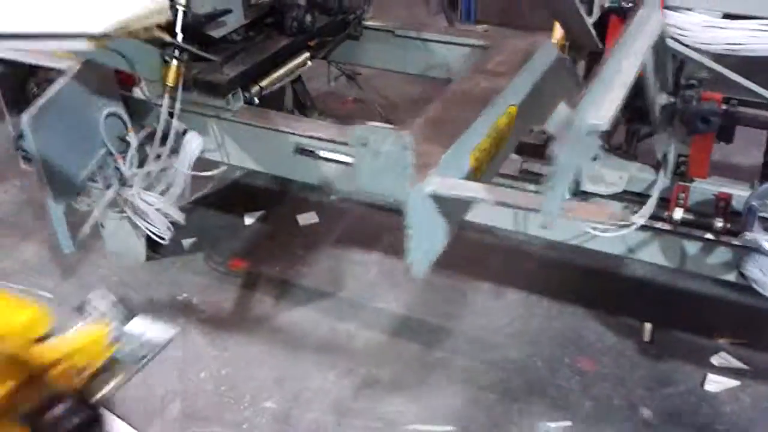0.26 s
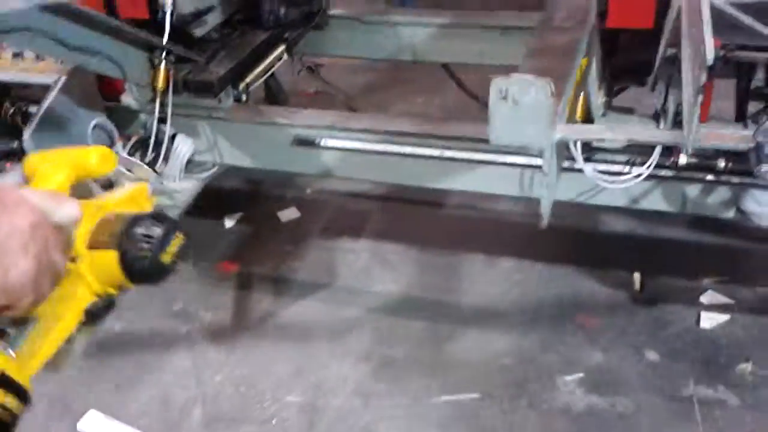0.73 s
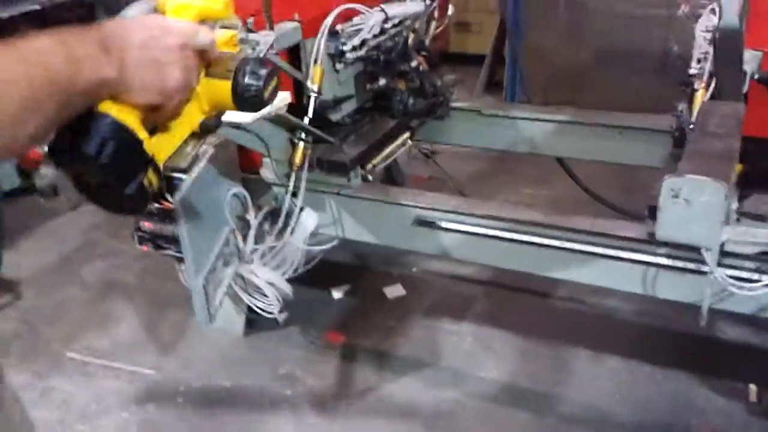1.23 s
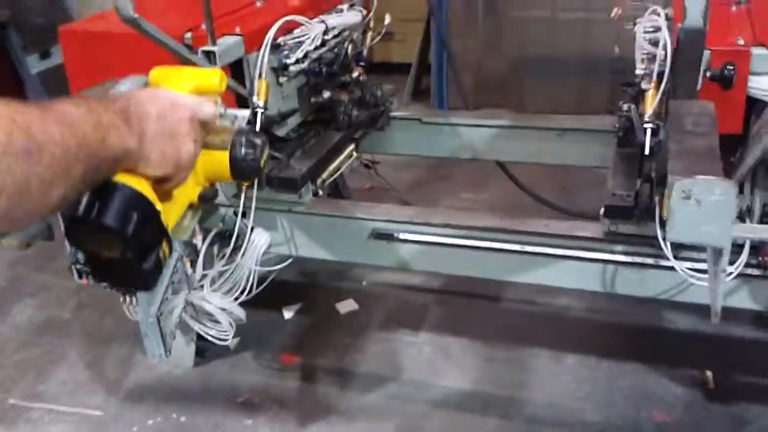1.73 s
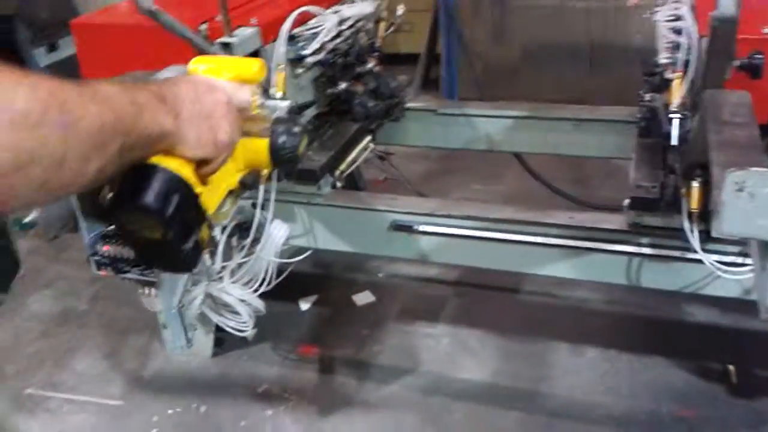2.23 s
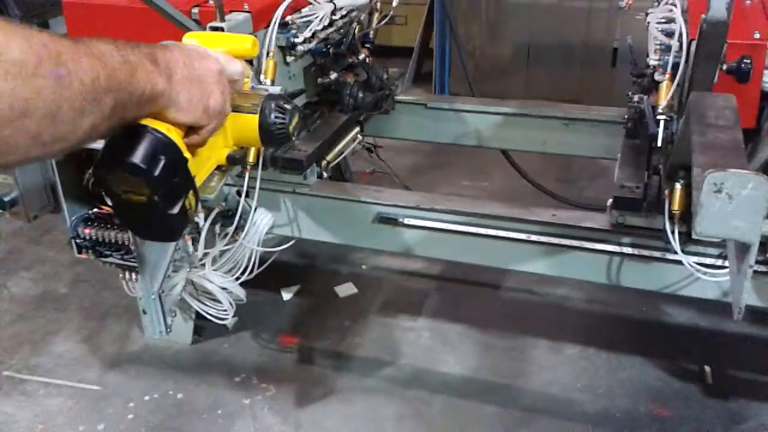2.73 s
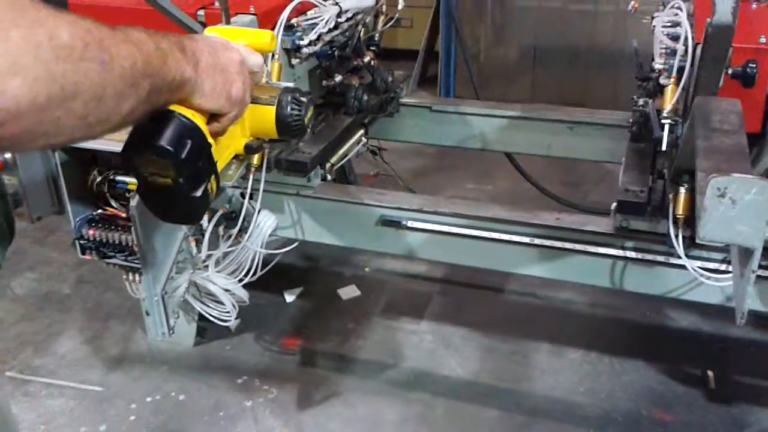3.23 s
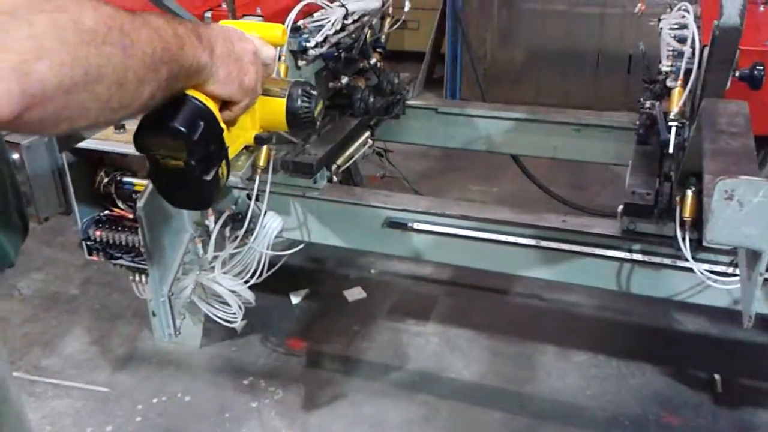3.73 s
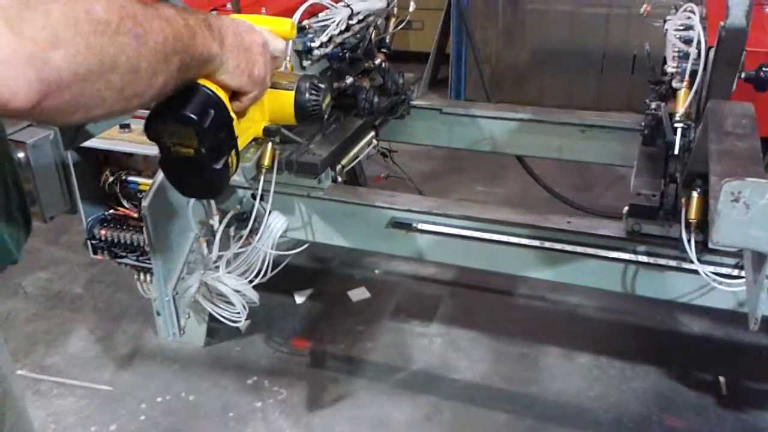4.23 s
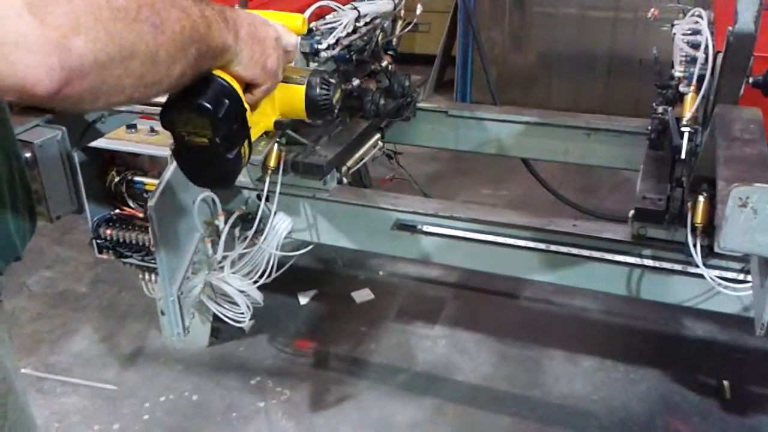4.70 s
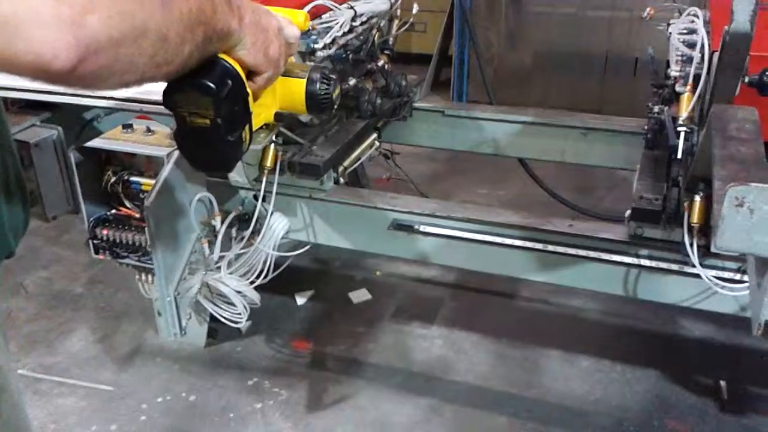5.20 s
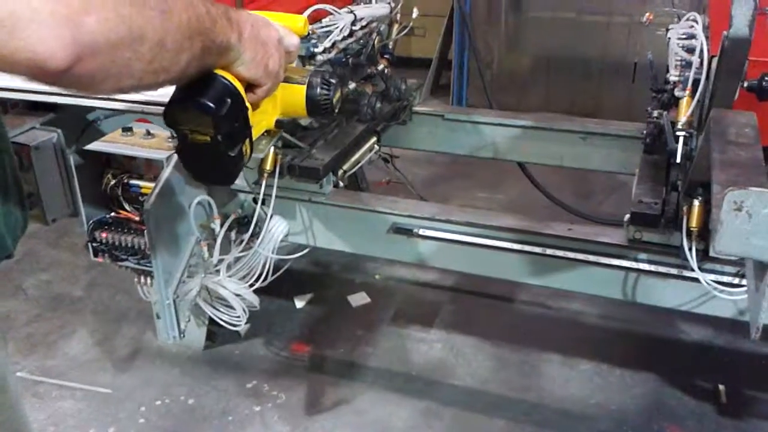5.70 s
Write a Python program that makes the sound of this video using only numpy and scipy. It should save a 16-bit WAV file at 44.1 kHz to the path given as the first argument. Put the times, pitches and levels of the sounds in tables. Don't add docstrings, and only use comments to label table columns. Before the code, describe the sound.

For the first half second there is only a workshop hall: steady broadband hiss of distant machines, low mains hum and soft handling rumble. At about 0.54 s a switch clicks and a handheld saw starts, a growl rising into fan hiss and a thin high gear whine, with small bumps near 1.0 and 1.24 s. At about 1.45 s the blade touches a metal profile; a squealing near-steady note sings around 1.55-1.7 s and strong knocks land at 1.6 and 1.8 s. Loud, bright, gritty cutting follows, heaviest around 2.0-2.3 s, with a faint slowing groan near 2.4 s. A knock comes at 3.0 s, then the cut is somewhat lighter, hollow and wavering until 4.5 s. Pressure lifts briefly at 4.7 s, the teeth catch again at 4.83 s, another knock comes at 5.3 s, and the scrape swells through the end. Close, centred microphone; compressed, watery top.

```python
import sys
import numpy as np
from scipy import signal
from scipy.fft import rfft, irfft
from scipy.io import wavfile
from scipy.ndimage import uniform_filter1d

SR = 44100
rng = np.random.default_rng(int(sys.argv[2]) if len(sys.argv) > 2 else 0)


def inscribe(sig):
    pcm = np.round(np.clip(np.atleast_2d(sig).T, -1, 1) * 32767)
    wavfile.write(sys.argv[1], SR, pcm.astype(np.int16))


def gain_from_db(level_db):
    decades = np.asarray(level_db, float) / 20
    return 10 ** decades


N = 262395
SECONDS = np.arange(N) / SR

# pitch_hz, density_db
HALL_TONE = [(260, -34), (450, -18.5), (507, -35), (780, -19), (815, -14), (891, -17.5), (1220, -19),
             (1390, -13.5), (1930, -11), (2340, -10.5), (3290, -17.5), (4500, -16.5), (4990, -19.5),
             (8390, -16), (15600, -32.5)]
# pitch_hz, rms_db
HUM = [(119.7, -66), (179.5, -63.5), (299.2, -57), (359.0, -51), (418.9, -53), (838, -60), (1866, -66)]
# centre_s, change_db, half_length_s
JOLTS = [(.05, 11, .3), (.56, 6, .04), (1.1, 7, .3), (1.31, 7, .06), (1.46, -8, .04), (1.84, 4, .04),
         (1.995, 12, 0.038), (2.4, -16, .1), (2.9, 5, .04), (3.25, -8, .25), (3.6, -8, .15), (3.88, 9, .03),
         (4.04, 9, .08), (4.28, -8, .06), (4.36, 5, .04), (4.6, 15, 0.089), (4.72, 11, .06),
         (4.87, 11, 0.046), (5.32, 6, .04), (5.45, 16, 0.046), (5.65, 9, 0.15), (5.87, 6.5, 0.033)]
# time_s, level_db
IDLE_HISS = [(.48, -48), (.59, -40), (.61, -37), (.67, -35.5), (.78, -31), (1.18, -35.5), (1.25, -34),
             (1.442, -33.5), (1.46, -30)]
# pitch_hz, density_db
FAN_TONE = [(1650, -24), (2800, 2.5), (3030, -5), (4510, -8), (4780, -3), (5320, -5.5), (7630, 0.5),
            (9680, -0.5), (10600, -10), (13000, -16), (15700, -15)]
# time_s, mesh_hz
GEAR_MESH = [(.55, 4600), (.7, 6150), (.78, 6700), (.9, 7400), (1.0, 7750), (1.15, 8000), (1.44, 8450)]
# mesh_multiple, start_s, end_s, level_db
WHINE = [(.81, .95, 1.15, -46), (1.0, .86, 1.1, -38), (1.0, 1.08, 1.46, -43), (1.17, .72, .9, -37),
         (1.25, .66, .8, -44)]
# time_s, pitch_hz, level_db
GLIDES = [
    [(.54, 500, -62), (.58, 620, -49), (.62, 760, -46), (.68, 980, -39), (.73, 1100, -43), (.8, 1120, -54),
     (.9, 1130, -75)],
    [(2.28, 570, -65), (2.35, 510, -46), (2.45, 430, -45), (2.55, 375, -48), (2.65, 360, -70)],
]
# time_s, pitch_hz, level_db
VENT = [(.7, 9250, -62), (.8, 9420, -44), (.95, 9450, -47), (1.05, 9550, -41), (1.14, 9750, -46),
        (1.22, 9800, -65)]
# start_s, peak_db (the knock peaks 6 dB below this), ring_hz
KNOCKS = [(0.539, -18, 1710), (0.959, -38, 1990), (1.022, -14.5, 2640), (1.239, -18, 2050),
          (1.483, -14, 3550), (1.619, -5, 2620), (1.827, 0, 2970), (3.002, -7, 3100), (4.579, -19, 1720),
          (4.827, -7, 2410), (5.309, -15, 3170)]
# pitch_hz, density_db
SCRAPE_TONE = [(260, -59), (450, -32.5), (780, -15.5), (1100, -10.5), (1250, -14.5), (1370, -15.5),
               (1660, -12.5), (2050, -13.5), (3200, -3), (4840, -6.5), (6140, -1), (6610, 0.5),
               (11100, 0.5), (12500, -0.5), (15600, 21)]
# time_s, pressure_db (as scrape level), freedom_db (how freely the profile rings)
FEED = [(1.44, -38, 1), (1.473, -16, 0), (1.58, -11, 0.5), (2.0, -9, 0.9), (2.29, -9, .3), (2.33, -12, 0.5),
        (2.83, -17, -0.1), (2.93, -12.5, 1), (3.07, -14, -1), (3.33, -18, -0.5), (3.64, -16, -.3),
        (4.32, -17.5, 1.2), (4.55, -14.5, 1.6), (4.78, -12, -0.8), (4.92, -18, 4), (4.99, -10.5, -0.2),
        (5.21, -12.5, 0.2), (5.65, -8.5, 1.7)]
# centre_s, change_db, half_length_s
NUDGES = [(1.72, -5.5, 0.083), (1.84, 1.5, 0.033), (1.91, -3, 0.039), (2.0, 0.5, .04), (3.39, 3, 0.069),
          (3.45, 4.5, 0.056), (3.5, -0.5, .04), (3.57, 3.5, .05), (4.06, 4, .06), (4.71, -18.5, 0.13),
          (4.735, 0, 0.018), (4.84, -0.5, 0.035), (5.84, -2, 0.17)]
ENTRIES_S = [1.7, 4.8]
# ring_hz, width_hz, over_hiss_db
FIRST_TOUCH = [(2200, 40, 10), (2970, 40, 12), (3660, 45, 10), (5120, 60, 5), (7320, 80, 9)]
SQUEAL = [(1320, 15, 14), (1495, 20, 12), (2730, 60, 9), (2920, 30, 11), (9735, 60, 11)]
EARLY_RINGS = [(4300, 60, 7), (6080, 60, 7), (6548, 40, 12)]
TOP_WALL = [(1080, 70, 8), (4500, 1500, -2.5)]
PUSH = [(2755, 30, 5), (5975, 60, 9), (8870, 90, 6), (9560, 70, 6)]
PUSH_END = [(1150, 80, 6), (6500, 60, 7), (8350, 90, 6)]
SINKING = [(3075, 90, 10)]
BREAK_THROUGH = [(910, 120, 2.7), (1640, 50, 2.2)]
HOLLOW = [(844, 44, 5.4), (1222, 55, 6.8), (3100, 150, 4.8)]
SIDE_WALLS = [(7350, 200, 3), (7734, 60, 4), (8570, 150, 5)]
BEFORE_LIFT = [(5970, 120, 5.4)]
FAR_WALL = [(1230, 53, 6.1), (3580, 330, 3), (5970, 99, 2)]
LAST_PUSH = [(8520, 110, 6)]
# start_s, end_s, resonances
STAGES = [(1.44, 1.59, FIRST_TOUCH), (1.51, 1.75, SQUEAL), (1.48, 1.95, EARLY_RINGS), (1.44, 2.5, TOP_WALL),
          (1.79, 2.3, PUSH), (2.15, 2.4, PUSH_END), (1.8, 2.8, SINKING), (2.35, 2.72, BREAK_THROUGH),
          (2.75, 3.7, HOLLOW), (2.9, 4.3, SIDE_WALLS), (4.4, 4.62, BEFORE_LIFT), (4.82, 5.8, FAR_WALL),
          (5.5, 5.99, LAST_PUSH)]
# centre_s, change_db, half_length_s
SHUDDERS = [(1.49, 0, .06), (1.6, -3, .08), (2.27, 4, 0.085), (2.47, 3.5, 0.2), (2.93, -3, 0.096),
            (3.45, 1.5, 0.23), (4.6, 3.5, 0.084), (4.74, -4, .05), (4.84, 4, 0.044), (5.05, -2, 0.31),
            (5.9, -4, .1)]
# centre_s, low_hz, high_hz, level_db
SPLITS = [(.193, 6300, 7600, -46), (.29, 6900, 9000, -45), (1.078, 7500, 9700, -37),
          (2.077, 5600, 7000, -23), (3.332, 5600, 7000, -29), (3.355, 8200, 11000, -22),
          (3.913, 8200, 9700, -26), (3.913, 5000, 6400, -28), (4.793, 7500, 9000, -28),
          (5.025, 10200, 11700, -21), (5.748, 8900, 10400, -22), (5.748, 5600, 7000, -22)]
# pitch_hz, quiet_db, loud_db
GAPS = [(400, -30, -30), (1000, -10, -8), (2800, -9, -7), (3700, -7, -1), (4900, -8, 0), (5700, -10, -6),
        (9300, -9, -7), (10600, 0, -7), (11700, -1, -3), (12400, 0, 3.5), (13200, 0, 0), (13900, 1, 3),
        (15700, 1, 1.5)]


def rms_one(x):
    return x / np.sqrt(np.mean(x ** 2) + 1e-20)


def in_time(rows, silent=None):
    s, first, *rest = np.transpose(rows)
    return [np.interp(SECONDS, s, first, silent, silent)] + [np.interp(SECONDS, s, c) for c in rest]


def bumps(rows):
    return sum(db * np.clip(1 - np.abs(SECONDS - s) / half_s, 0, 1) for s, db, half_s in rows)


def window(start_s, end_s, fade_s):
    return np.clip(np.minimum(SECONDS - start_s, end_s - SECONDS) / fade_s, 0, 1)


def drift(rate):
    r = np.exp(-80 * np.pi * rate / SR)
    noise = rng.standard_normal(N // 40 + 2002)
    slow = signal.lfilter([1], [1, -2 * r, r * r], noise)[2000:]
    return np.interp(np.arange(N) / 40, np.arange(len(slow)), rms_one(slow))


def coloured(x, spectrum):
    hz = np.maximum(np.fft.rfftfreq(N, 1 / SR), 1)
    points_hz, points_db = np.transpose(spectrum)
    gain = gain_from_db(np.interp(np.log(hz), np.log(points_hz), points_db))
    return irfft(rfft(x) * gain, N)


def band(x, low_hz, high_hz):
    return signal.sosfilt(signal.butter(4, [low_hz, high_hz], "band", fs=SR, output="sos"), x)


def resonance(x, hz, width_hz):
    r = np.exp(-np.pi * width_hz / SR)
    feedback = [1, -2 * r * np.cos(2 * np.pi * hz / SR), r * r]
    return signal.lfilter(np.array([1, 0, -1]) * (1 - r * r) / 2, feedback, x)


def contacts(per_s, spread_db):
    sizes = gain_from_db(spread_db * np.minimum(rng.exponential(1, N), 5)) * rng.choice([-1, 1], N)
    return rms_one(sizes * (rng.random(N) < per_s / SR))


def whistle(hz, level_db, wobble, flutter_db):
    phase = 2 * np.pi * np.cumsum(hz * (1 + wobble * drift(28.8))) / SR
    return np.sqrt(2) * gain_from_db(level_db + flutter_db * drift(27)) * np.sin(phase)


def feed():
    usual_db = -13
    before_touch = (FEED[0][0] - .01, -99, 0)
    push_db, free_db = in_time([before_touch] + list(FEED))
    return push_db + bumps(NUDGES) - usual_db, free_db


def workshop():
    air = band(coloured(rng.standard_normal(N), HALL_TONE), 150, 18000)
    floor = rms_one(air + .9 * resonance(air, 1850, 200)) * gain_from_db(-33.5 + .7 * drift(5))
    drone = rms_one(band(rng.standard_normal(N), 183, 424)) * gain_from_db(-56.5)
    hum = sum(whistle(hz, db, wobble=.0003, flutter_db=.7) for hz, db in HUM)
    rest_db, shake_db_per_db, lumps_db = -66.5, 2.5, 2.5
    hard_push_db = np.maximum(feed()[0], 0)
    rumble_db = rest_db + shake_db_per_db * hard_push_db + bumps(JOLTS) + lumps_db * drift(5.1)
    rumble = rms_one(band(rng.standard_normal(N), 33, 230)) * gain_from_db(rumble_db)
    return floor + drone + hum + rumble


def motor():
    hiss_db, = in_time(IDLE_HISS, silent=-99)
    fan_air = rms_one(coloured(contacts(per_s=13000, spread_db=4.5), FAN_TONE))
    air = fan_air * gain_from_db(hiss_db + 1.6 * drift(42))
    switch_s, half_s = .55, .022
    puff = gain_from_db(-40) * window(switch_s - half_s, switch_s + half_s, half_s)
    housing_re_hiss_db = -13
    housing = rms_one(band(rng.standard_normal(N), 650, 1310)) * (gain_from_db(hiss_db + housing_re_hiss_db) + puff)
    mesh_hz, = in_time(GEAR_MESH)
    whine = whistle(*in_time(VENT, silent=9500), wobble=.012, flutter_db=3)
    for multiple, start_s, end_s, db in WHINE:
        line = whistle(mesh_hz * multiple, db, wobble=.008, flutter_db=3)
        whine = whine + window(start_s, end_s, .05) * line
    for rows in GLIDES:
        whine = whine + whistle(*in_time(rows), wobble=.04, flutter_db=2.5)
    return air + housing + whine


def knocks():
    out, t = np.zeros(N + SR), np.arange(SR // 10) / SR
    for start_s, peak_db, ring_hz in KNOCKS:
        burst = rng.standard_normal(len(t)) * np.exp(-t / .008)
        ring = resonance(resonance(burst, ring_hz, 900), ring_hz, 900)
        blow = .08 * band(burst, 700, 5000) + ring
        at = round(start_s * SR)
        out[at:at + len(t)] += blow / np.max(np.abs(blow)) * gain_from_db(peak_db - 6)
    return out[:N]


def cut():
    teeth = contacts(per_s=16000, spread_db=1.5) * gain_from_db(0.69 * drift(21) + 0.65 * drift(43))
    hiss = coloured(teeth, SCRAPE_TONE)
    sound = hiss.copy()
    for start_s, end_s, rings in STAGES:
        for hz, width_hz, over_hiss_db in rings:
            drive = hiss * window(start_s, end_s, .03) * (gain_from_db(over_hiss_db + 1.5 * drift(18)) - 1)
            sound += resonance(drive, hz, width_hz)
    push_db, free_db = feed()
    knock_db = .2 * free_db + bumps(SHUDDERS)
    entering_db = bumps([(s, -6, .4) for s in ENTRIES_S])
    # low_hz, high_hz, usual_db, dB per dB of feed, extra_db
    parts = [(5200, 11700, -13.5, 1, 0),
             (1900, 5200, -21.5, .69, free_db),
             (500, 1900, -28.5, .52, knock_db),
             (11700, 16500, -23, 1, entering_db)]
    out = 0
    for low_hz, high_hz, usual_db, follows, extra_db in parts:
        part = band(sound, low_hz, high_hz)
        slow = np.sqrt(uniform_filter1d(part ** 2, size=SR // 4) + 1e-12)
        out = out + part / slow * gain_from_db(usual_db + follows * push_db + extra_db)
    return out + window(1.54, 1.71, .03) * whistle(2732, -25, wobble=.002, flutter_db=2.5)


def scene():
    mono = workshop() + motor() + knocks() + cut()
    return np.stack([mono, mono])


def thin_out(x):
    shape = dict(window="cosine", nperseg=2048, noverlap=1024)
    hz, s, z = signal.stft(x, SR, **shape)
    at_hz, quiet_db, loud_db = np.transpose(GAPS)
    power = np.abs(z) ** 2
    total_db = 10 * np.log10(np.sum(power, axis=0) + 1e-12)
    busy = np.clip((total_db + 28) / 6, 0, 1)
    limit_db = np.outer(np.interp(hz, at_hz, quiet_db), 1 - busy)
    limit_db += np.outer(np.interp(hz, at_hz, loud_db), busy)
    tile = np.cumsum(1 / np.interp(hz, [2000, 5000, 12000], [4, 8, 14])).astype(int)
    lasting = uniform_filter1d(rng.standard_normal((tile[-1] + 1, len(s))), size=3, axis=1)
    limit_db += 5.5 * lasting[tile]
    nearby = uniform_filter1d(power, size=48, axis=0)
    kept = z * (power > nearby * gain_from_db(2 * limit_db))
    kept_nearby = uniform_filter1d(np.abs(kept) ** 2, size=48, axis=0)
    makeup = nearby / (kept_nearby + .3 * nearby + 1e-20)
    return signal.istft(kept * np.sqrt(1.3 * makeup), SR, **shape)[1][:N]


def low_pass(x):
    return signal.sosfilt(signal.butter(12, 15730, fs=SR, output="sos"), x)


def record(dry):
    white, side = rng.standard_normal(N), 0
    for s, low_hz, high_hz, db in SPLITS:
        side = side + window(s - .021, s + .021, .014) * rms_one(band(white, low_hz, high_hz)) * gain_from_db(db)
    mono = thin_out(.9 * np.tanh(dry[0] / .9))
    mono = mono / (1 + (mono / .88) ** 6) ** (1 / 6)
    return low_pass(mono + side * np.array([[1], [-1]]))


dry = scene()
out = record(dry)
inscribe(out)
```